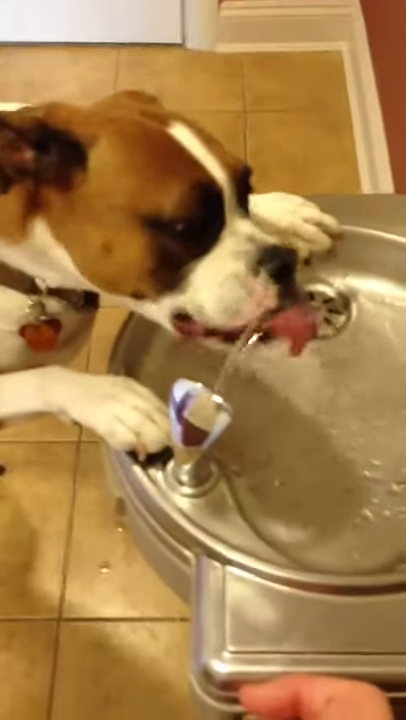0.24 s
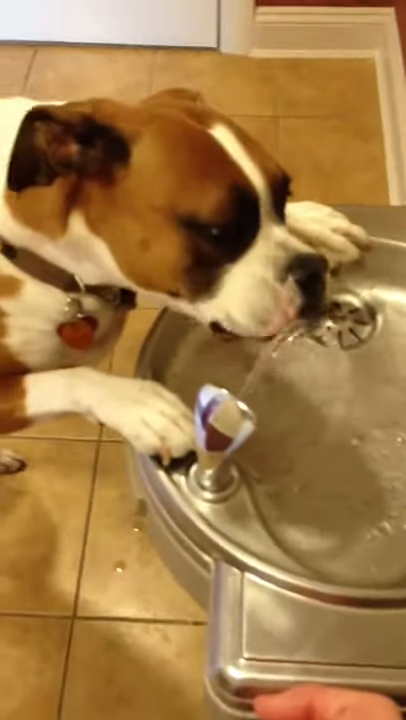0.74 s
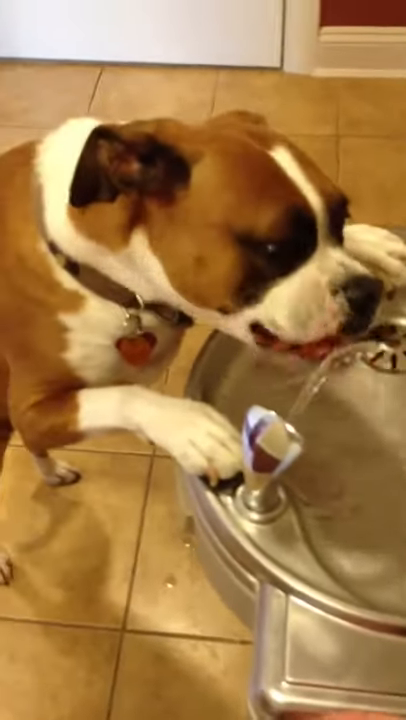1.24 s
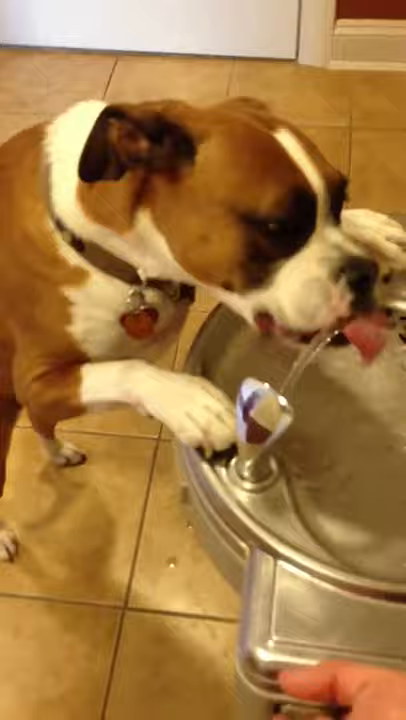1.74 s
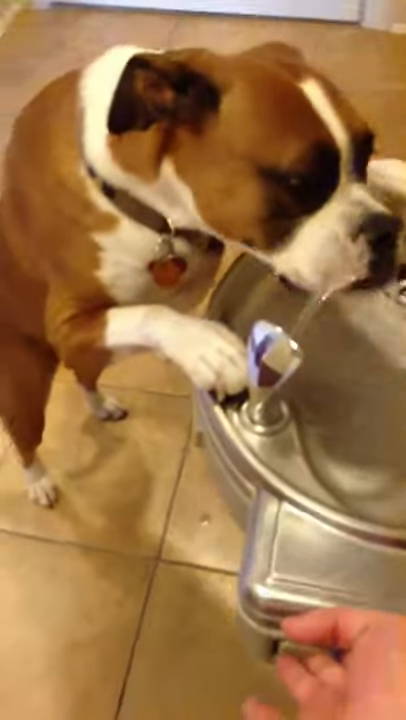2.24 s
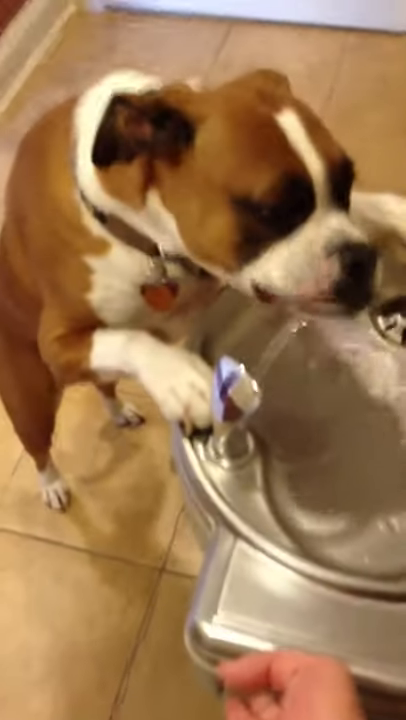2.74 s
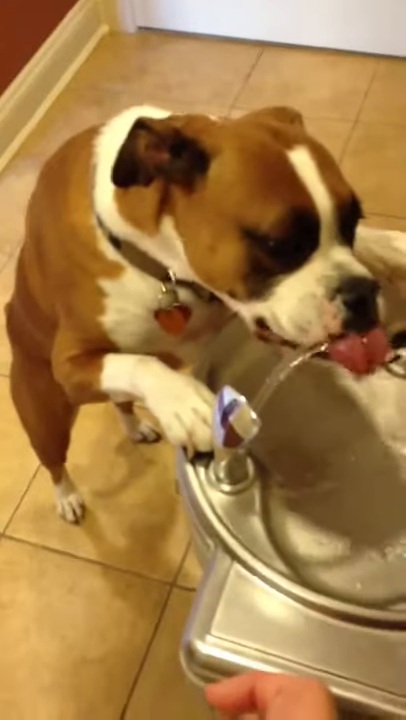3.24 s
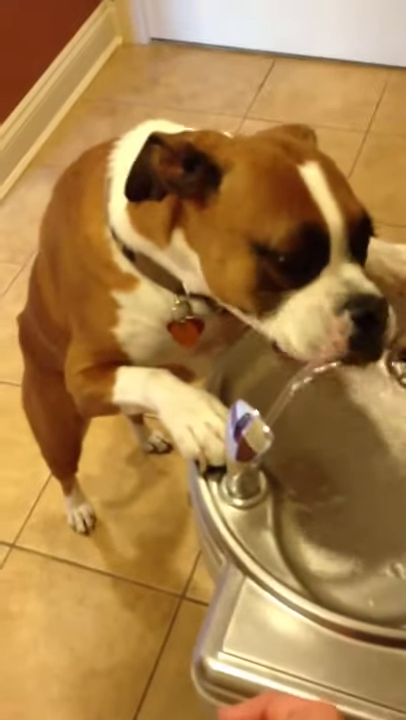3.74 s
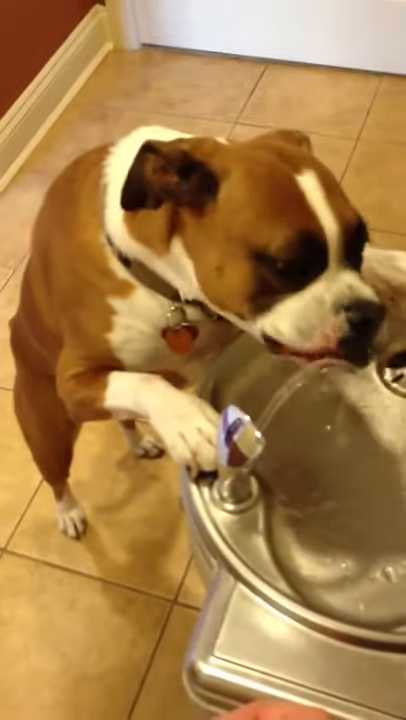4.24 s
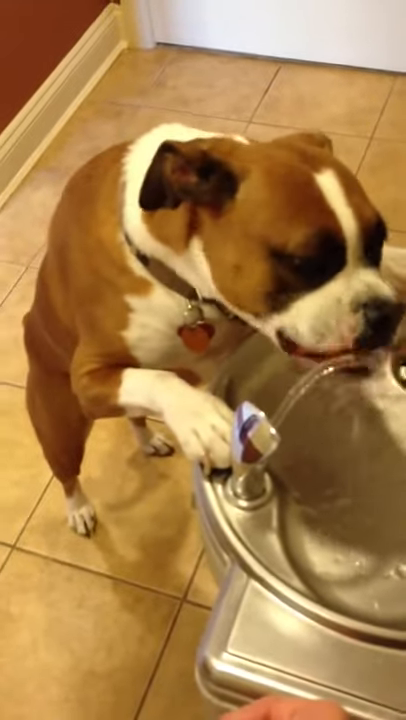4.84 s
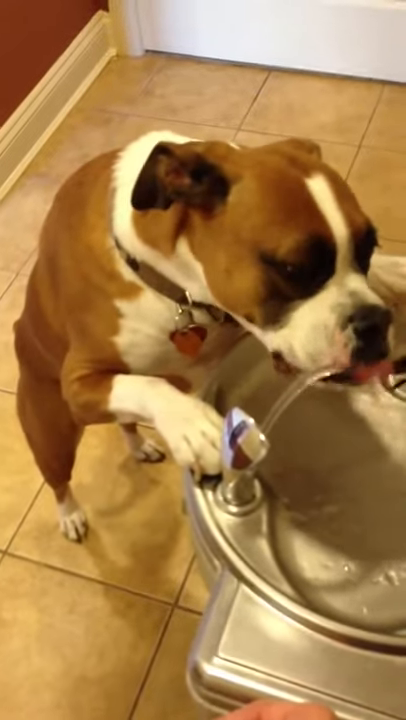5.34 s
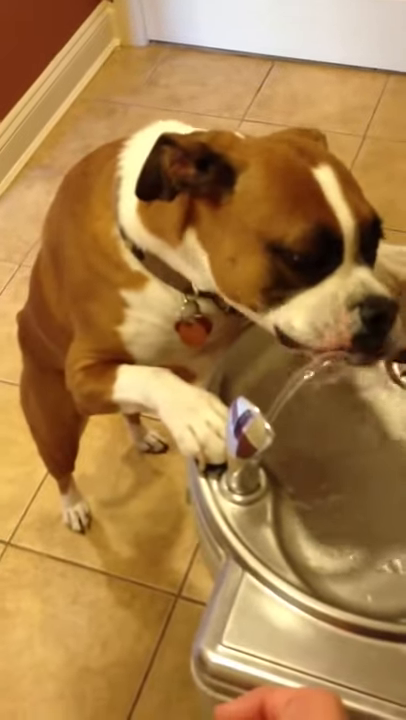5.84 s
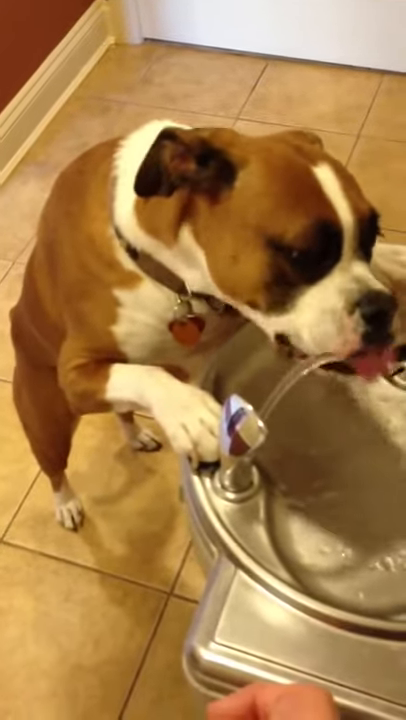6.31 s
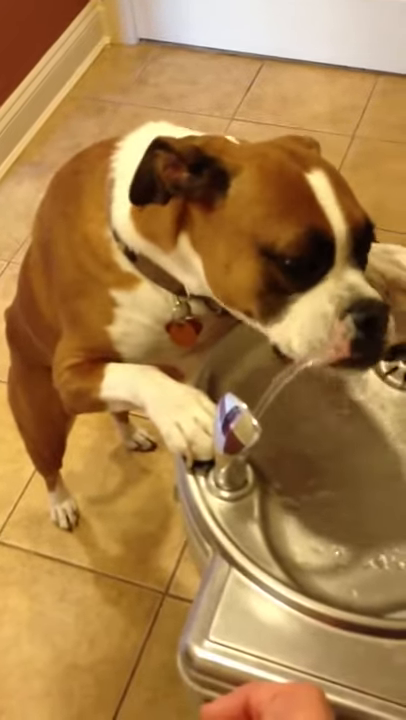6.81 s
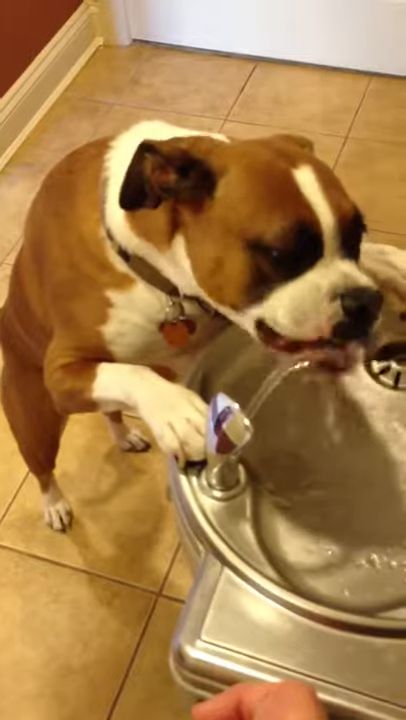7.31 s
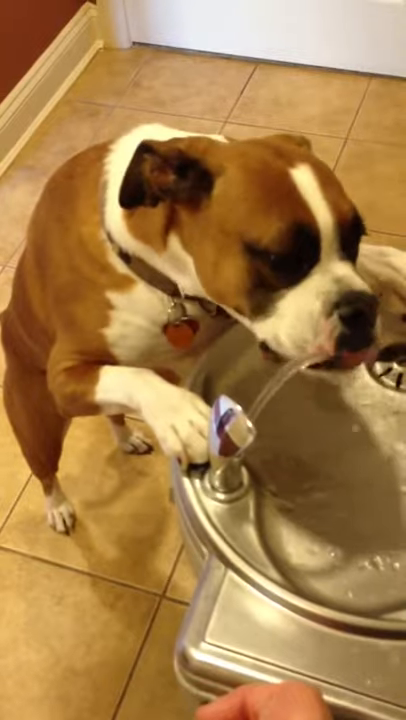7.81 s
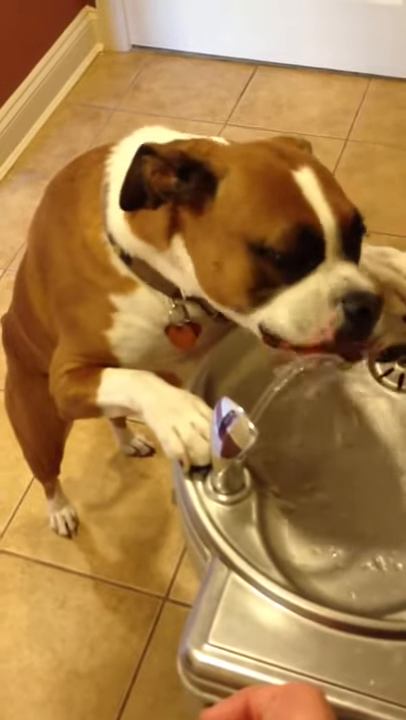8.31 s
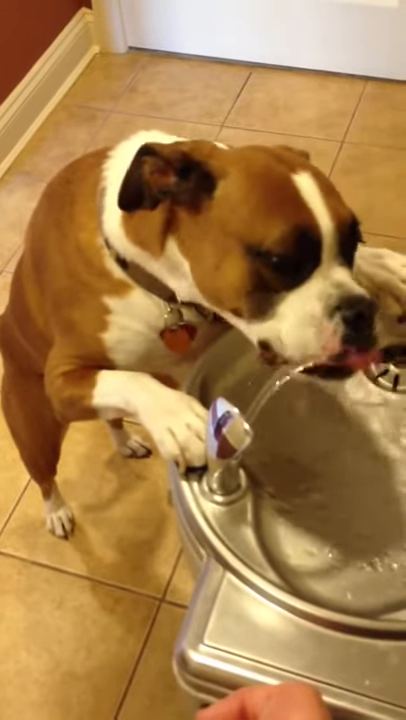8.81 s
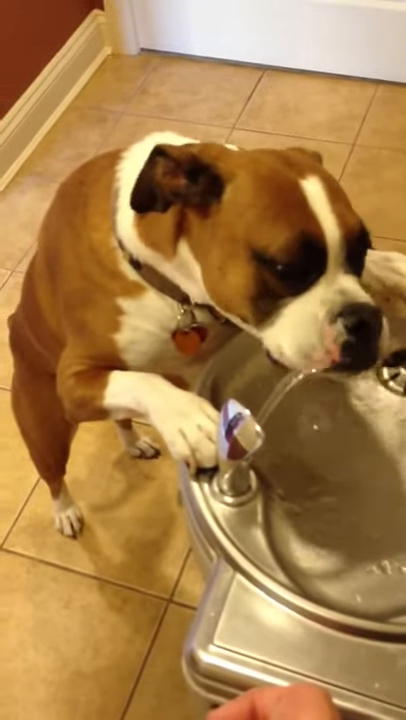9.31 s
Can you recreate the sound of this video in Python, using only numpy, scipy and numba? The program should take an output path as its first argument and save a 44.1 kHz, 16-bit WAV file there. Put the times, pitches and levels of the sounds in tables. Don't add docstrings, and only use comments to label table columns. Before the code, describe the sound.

Close, irregular wet lapping and smacking, with drips ticking on metal, soft gulping thuds, trickling water and a steady cooler hum in a hard room.

```python
import sys
import numpy as np
from scipy import signal
from scipy.fft import rfft, irfft
from scipy.io import wavfile
from scipy.ndimage import uniform_filter1d
from numba import njit

SR = 44100
rng = np.random.default_rng(int(sys.argv[2]) if len(sys.argv) > 2 else 0)


def elevation(decibels):
    levels = np.asarray(decibels, float)
    return 10 ** (levels / 20)


def transcribe(u):
    v = np.clip(np.atleast_2d(u).T, -1, 1)
    q = np.round(v * 32767).astype(np.int16)
    wavfile.write(sys.argv[1], SR, q)


N = 421596

# (frequency [Hz], width [Hz], level [dB])
SHARED_COLOUR = [(345, 70, 3), (1650, 500, 4), (3100, 900, 2), (4800, 1000, 2), (5750, 700, -6)]


def laps():
    # (time [s], peak level [dB], pitch [Hz])
    lap_pops = [(0.0, -29, 1570), (0.1286, -17.5, 1560), (0.4013, -25.5, 1560), (0.7152, -28, 1900),
                (0.836, -34, 2260), (1.315, -20, 1590), (1.5814, -33, 1460), (1.777, -33.5, 1530),
                (1.918, -22.5, 1840), (2.1836, -32, 1000), (2.303, -30, 2360), (2.5202, -23.5, 1910),
                (2.6362, -24.5, 1900), (2.9607, -31.5, 2050), (3.1245, -27.5, 1670), (3.406, -26, 1860),
                (3.7356, -28, 1940), (3.9055, -29, 1950), (4.004, -33, 1260), (4.0572, -35, 1179),
                (4.639, -33, 1850), (5.54, -29, 1240), (6.779, -33.5, 1240), (7.12, -35.5, 1660),
                (7.3103, -30.5, 2400), (7.7374, -36, 1300), (7.8845, -30.5, 2100), (7.9209, -32, 2060),
                (8.5358, -32, 1780), (8.6617, -34, 1570),
                (0.257, -43, 1750), (0.979, -35.5, 1450), (1.915, -30, 950), (2.784, -34, 1720),
                    (4.295, -35, 1330), (4.501, -37, 1330), (5.1293, -39.5, 1380), (5.3716, -34, 1160),
                    (5.541, -37, 1600), (6.983, -38.5, 1410), (7.395, -34.5, 1350), (7.452, -37.5, 1080),
                    (8.0207, -36, 1470), (8.859, -34, 1830), (9.005, -36, 1760), (9.1677, -37, 1640),
                    (9.5073, -36, 1430), (0.129, -22.5, 1950), (0.4, -31, 1065), (0.716, -28.5, 1490),
                    (3.405, -34, 1240), (2.375, -39, 2500), (3.264, -35, 1980)]
    bursts = rung(lap_pops, cycles=6.5, middle_hz=1700, growth=.3)
    return pops(bursts, lead_s=.001519, gain_db=2.7, rise=.0053, swell=.68,
                snap_db=-3.8, octaves=.86, snap_cycles=2.76, count=6)


def smacks():
    # (time [s], peak level [dB], pitch [Hz])
    small_bursts = [(0.0308, -30, 3660), (0.4005, -31.5, 3160), (0.7123, -35, 2970), (0.9777, -31, 3070),
                    (1.3124, -28.5, 4750), (1.5773, -37, 4540), (1.9126, -29.5, 4800), (2.185, -33.5, 3080),
                    (2.5212, -29.5, 2930), (2.6424, -27, 4100), (2.644, -24, 4940), (2.9597, -32, 5160),
                    (3.1218, -29.5, 2660), (3.2959, -32, 2700), (3.3972, -32, 3230), (3.736, -40, 2600),
                    (3.9055, -33.5, 2700), (4.815, -33.5, 4700), (5.44, -37, 3100), (5.5395, -33.5, 3160),
                    (5.7254, -34, 4290), (6.3445, -31, 4300), (6.5026, -28, 3220), (6.7845, -37, 3090),
                    (7.1132, -35, 2900), (8.0227, -31.5, 3380), (8.8583, -33, 2520), (9.2903, -32, 4460),
                    (9.2903, -29, 3410), (9.4838, -34.5, 2560),
                    (0.1281, -44, 2490), (0.5718, -36, 4000), (0.838, -37, 4700), (0.866, -34.5, 2450),
                     (1.9126, -33.5, 2956), (2.0388, -37.5, 3200), (2.299, -38, 2700), (2.4556, -33, 4330),
                     (2.785, -41, 2850), (3.0187, -37, 4470), (3.2416, -33, 3950), (4.2951, -38.5, 3330),
                     (4.558, -42, 3500), (4.915, -37.5, 3070), (5.1246, -39.5, 3000), (5.248, -39, 2630),
                     (5.7502, -36.5, 2540), (6.1729, -35.5, 3140), (6.5026, -38, 3880), (6.6782, -33, 5200),
                     (6.982, -36.5, 2720), (7.2769, -35.5, 4560), (7.295, -34.5, 2820), (7.7474, -36, 3870),
                     (7.8795, -34, 4740), (8.2672, -35, 4470), (8.3796, -31.5, 3960), (8.508, -31, 4430),
                     (8.6617, -35, 3460), (9.0055, -33, 3200),
                    (0.401, -32.5, 4480), (1.7778, -39.5, 2900), (2.636, -33, 2700), (2.6362, -33, 4130),
                     (3.125, -31, 5300), (3.399, -32, 4950), (3.899, -31, 5100), (4.1939, -40, 2720),
                     (4.238, -36, 4450), (5.1991, -33.5, 5500), (6.0662, -40.5, 3000),
                     (6.2996, -37.5, 2650), (3.737, -33.5, 4400), (8.221, -44, 2400), (8.515, -34.5, 3900),
                     (9.1474, -43.5, 2400), (9.19, -41, 2330), (2.302, -33, 4200), (4.006, -39, 3400),
                     (4.637, -30, 6460), (5.785, -38, 3200), (5.885, -41, 3400), (5.5, -43, 5500),
                     (6.345, -26.5, 5400), (6.3984, -36, 4300), (6.692, -40, 2660), (9.0055, -35, 4200),
                     (1.025, -38, 3250), (0.716, -30, 2560), (0.719, -34, 2900), (0.7175, -40, 2800),
                     (0.726, -45, 3950), (0.031, -40, 2240), (0.13, -34.5, 5000), (3.053, -42, 5200),
                     (1.318, -35, 2130), (1.70, -41.5, 2200), (2.6445, -31.5, 3420), (2.6445, -39, 5500),
                     (2.376, -37, 4600), (6.79, -36, 3050), (6.803, -41, 3100), (6.513, -36, 2950),
                     (3.405, -31, 3300), (2.68, -40, 5200), (3, -42, 4000), (0.985, -34, 3020),
                     (4.09, -41, 4700), (2.655, -37, 4900), (2.664, -34, 3700), (6.59, -45, 4200),
                     (6.72, -46, 4300), (7.92, -35.5, 5000), (7.965, -46, 4200), (9.147, -37.5, 5100),
                     (9.19, -38, 4800), (5.4, -42, 4500), (4.857, -43, 4200), (4.926, -39, 3240)]
    bursts = rung(small_bursts, cycles=10.5, middle_hz=3400, growth=.15)
    return pops(bursts, lead_s=.0004, gain_db=10.2, rise=.019, swell=.88,
                snap_db=-10.0, octaves=.51, snap_cycles=14.2, count=6)


def drops():
    # (time [s], peak level [dB], pitch [Hz])
    drop_hits = [(0.127, -42, 12400), (0.7133, -37.5, 6230), (0.839, -44, 8230), (0.978, -42, 5600),
                 (1.1014, -43, 6850), (1.5784, -39, 6800), (1.8195, -38.5, 10700), (1.913, -42, 6600),
                 (2.0827, -43, 6860), (2.1277, -38, 8000), (2.7107, -39.5, 7500), (2.7847, -36, 11900),
                 (2.9586, -38, 8440), (3.398, -39.5, 5950), (3.6356, -34, 12100), (4.1967, -38.5, 8850),
                 (4.4365, -40, 7260), (4.4834, -39, 11000), (5.1093, -41, 10100), (5.44, -41, 6940),
                 (5.4938, -32, 9260), (5.883, -43, 10400), (6.9915, -41, 6150), (7.014, -37.5, 11300),
                 (7.3302, -36, 10900), (8.0227, -36.5, 6670), (8.2661, -41, 12200), (8.5989, -39, 6200),
                 (9.3501, -40, 6500), (9.4823, -42, 7400), (0.3366, -45, 7600), (0.5691, -44, 7140),
                 (3.1148, -46, 6170), (3.7339, -40, 12000), (4.575, -49, 5600), (4.8888, -41, 11600),
                 (6.1649, -45, 9970), (6.3984, -42, 7040), (7.2499, -45, 7170), (7.6784, -42, 6900),
                 (7.9174, -44, 6670), (8.309, -48, 6440), (8.6557, -41.5, 6880), (9.2823, -48, 6810),
                 (1.258, -46, 8800)]
    bursts = rung(drop_hits, cycles=21, middle_hz=6100, growth=.045)
    return pops(bursts, lead_s=.0007, gain_db=11.2, rise=.003, swell=.084,
                snap_db=-3.0, octaves=.61, snap_cycles=8.1, count=6)


def gulps():
    # (time [s], peak level [dB], pitch [Hz])
    swallows = [(0.374, -38, 350), (1.011, -34.5, 363), (1.573, -38, 347), (1.674, -39, 343),
                (2.831, -33.5, 344), (3.453, -39.5, 378), (4.053, -29, 372), (4.35, -33.5, 277),
                (4.61, -35, 338), (4.965, -30.5, 350), (5.235, -31.5, 596), (5.594, -38.5, 366),
                (5.869, -42, 370), (6.222, -35.5, 336), (6.832, -36, 332), (7.09, -31, 593),
                (7.449, -35, 400), (8.078, -32.5, 394), (8.345, -40, 339), (8.715, -33, 353),
                (8.973, -31, 299), (8.974, -34.5, 580), (8.35, -36.5, 610), (4.06, -45, 655),
                (2.25, -48, 534), (9.26, -37.5, 370), (9.343, -31.5, 310), (0.455, -37.5, 340),
                (0.835, -42, 348), (2.262, -40, 296), (4.998, -38, 324), (7.71, -43.5, 555),
                (8.13, -39, 330)]
    bursts = rung(swallows, cycles=5.3, middle_hz=356, growth=.83)
    return pops(bursts, lead_s=.00279, gain_db=3.1, rise=.0029, swell=.56,
                snap_db=-8.0, octaves=.77, snap_cycles=3.0, count=4)


def gurgles():
    # (centre [s], half length [s], level [dB], top of the band [Hz])
    throat_swells = [(0.448, 0.12, -52.5, 465), (1.618, 0.039, -49.5, 510), (2.24, 0.031, -46.5, 1430),
                     (2.497, 0.033, -49, 900), (4.022, 0.013, -54, 1300), (4.628, .015, -51, 890),
                     (5.24, 0.009, -71, 900), (6.98, 0.071, -54.5, 884), (7.425, 0.027, -68, 900),
                     (8.373, 0.027, -58, 690), (8.972, 0.012, -47, 1100)]
    t = np.arange(N) / SR
    rattle = rng.standard_normal(N) * elevation(3.6 * walk(120))
    out = np.zeros(N)
    for centre_s, half_s, db, top_hz in throat_swells:
        band = colour(rattle, [(100, -30), (180, 0), (top_hz, -6), (2 * top_hz, -30)])
        out += elevation(db) * np.exp(-((t - centre_s) / half_s) ** 2) * band
    return out


def dog():
    # (delay [s], level [dB])
    near_echoes = [
        (.0021, -15),
        (.0056, -7),
        (.0155, -11),
    ]
    lap, smack, drop, gulp = laps(), smacks(), drops(), gulps()
    throat = gurgles()
    close = np.sum(lap + smack + drop + gulp, axis=0) + throat
    near = sum(elevation(db) * np.roll(close, int(s * SR)) for s, db in near_echoes)
    ring, snap = elevation(-.3) * lap + elevation(-4) * smack + elevation(-1) * drop + elevation(-4) * gulp
    sent = ring + elevation(-1.5) * snap + throat
    head_turn_s = .11
    pose = np.arange(N) // int(head_turn_s * SR) % 3
    walls = sum(room(sent * uniform_filter1d(1. * (pose == k), size=400)) for k in range(3))
    patchy = elevation(1.1 * walk(70) + 1.3 * walk(300))
    return resonate(close + near + patchy * walls, SHARED_COLOUR)


def rung(table, cycles, middle_hz, growth):
    s, db, hz = np.transpose(table)
    return np.transpose([s, db, hz, cycles * (hz / middle_hz) ** growth])


def pops(table, lead_s, gain_db, rise, swell, snap_db, octaves, snap_cycles, count):
    splash_s = .0055
    s, db, hz, cycles = np.transpose(table)
    chance = rng.uniform(-1, 1, (len(s), count, 3))
    start = np.maximum(s - lead_s, 0) * SR
    ring = bubbles(start.astype(np.int64), hz, np.clip(cycles, 1, 60) / 3, elevation(db + gain_db),
                   np.full(len(s), rise), swell)
    start = (start[:, None] + splash_s * SR * np.abs(chance[..., 0]) ** 2).ravel()
    size = elevation(db[:, None] + gain_db + snap_db + 2 * chance[..., 1]).ravel()
    places = (2 * np.arange(count) + 1 + chance[..., 2]) / count - .7
    hz = (hz[:, None] * 2 ** (octaves * places)).ravel()
    snap = bubbles(start.astype(np.int64), hz, np.full(hz.size, snap_cycles / 3), size, 0 * hz, swell)
    return np.array([ring, snap])


@njit
def bubbles(start, hz, cycles, size, rise, swell):
    out = np.zeros(N)
    for e in range(len(start)):
        span, phase = cycles[e] * SR / hz[e], 0.
        for j in range(min(int(5 * span), N - start[e])):
            phase += 2 * np.pi * min(hz[e] * (1 + rise[e] * j / span), .45 * SR) / SR
            envelope = (1 - np.exp(-j / (swell * span))) * np.exp(-j / span)
            out[start[e] + j] += size[e] * np.sin(phase) * envelope
    return out


def drips():
    # (start [s], length [s], level [dB], pitch [Hz])
    runoff = [(0.035, 0.085, -49.5, 1400), (0.058, 0.058, -48.5, 3680), (0.383, 0.042, -47, 1020),
              (0.424, 0.061, -50, 2750), (0.708, 0.038, -54, 680), (0.851, 0.071, -56.6, 805),
              (0.973, 0.073, -47.5, 3730), (1.007, 0.16, -54.5, 840), (1.617, 0.119, -54.4, 990),
              (1.884, 0.05, -50, 1100), (1.977, 0.044, -49.1, 2520), (2.073, 0.03, -51.0, 3320),
              (2.18, 0.029, -48.8, 6920), (2.183, 0.065, -48.7, 1380), (2.253, 0.064, -51.6, 650),
              (2.45, 0.038, -52.4, 750), (2.511, 0.032, -50, 7000), (2.81, 0.032, -50, 3080),
              (2.816, 0.058, -54, 840), (3.001, 0.049, -52.7, 1780), (3.094, 0.044, -55, 680),
              (3.167, 0.032, -55, 600), (3.292, 0.061, -49.5, 4950), (3.373, 0.031, -52, 470),
              (3.715, 0.035, -52.2, 1000), (3.773, 0.046, -51.5, 4260), (4.055, 0.038, -51, 590),
              (4.232, 0.029, -50.2, 4500), (4.264, 0.044, -56, 580), (4.348, 0.087, -55.1, 920),
              (4.908, 0.052, -53.5, 1320), (4.911, 0.037, -50, 6480), (5.265, 0.038, -50, 5530),
              (5.283, 0.035, -50.6, 2870), (5.518, 0.05, -47, 9460), (6.493, 0.035, -54, 1390),
              (6.734, 0.072, -55, 570), (6.766, 0.029, -47, 3030), (6.83, 0.073, -56, 930),
              (7.288, 0.052, -56, 1040), (7.355, 0.058, -54.5, 520), (7.373, 0.046, -51.1, 3490),
              (7.741, 0.04, -52, 2360), (8.223, 0.038, -52.8, 3930), (8.47, 0.057, -53.1, 490),
              (8.92, 0.044, -54, 600), (8.969, 0.064, -53, 654), (9.184, 0.041, -54, 1380)]
    # (start [s], length [s], level [dB], pitch [Hz])
    mouth_drains = [(0.41, 0.075, -55, 3200), (0.73, .1, -52, 2800), (0.995, 0.093, -52, 3000),
                    (2.3, 0.037, -48, 4300), (2.3, .035, -50, 2700), (2.655, .09, -46.5, 4400),
                    (2.79, .04, -51, 2950), (2.97, .07, -50.5, 2010), (3.415, 0.15, -52.5, 3300),
                    (3.43, .15, -53, 1900), (3.91, 0.087, -50, 1900), (4.3, .06, -53, 3300),
                    (4.825, 0.056, -55, 4600), (6.52, .1, -54, 3150), (6.79, .11, -51, 3130),
                    (7.12, 0.094, -52.5, 2900), (8.03, 0.087, -51.5, 3410), (8.515, .06, -51, 4300),
                    (8.87, .09, -54, 2450), (9.02, 0.085, -54, 3000), (9.15, .11, -53.5, 2340),
                    (9.3, 0.088, -49.5, 3390), (9.3, .05, -51, 4870), (0.4, .11, -50.5, 419),
                    (1.02, .07, -52, 380), (1.6, .1, -51.5, 450), (2.22, .07, -53, 900),
                    (4.06, 0.096, -50.5, 432), (6.84, .12, -54, 391), (9.36, .07, -51, 379),
                    (0.14, .1, -45, 2000), (0.725, .1, -49, 1900), (0.725, .1, -50, 1500),
                    (2.655, .07, -49, 5300), (9.01, .04, -51, 4300), (8.9, .06, -54, 4700),
                    (2.2, .07, -52, 1400), (5.55, .07, -51, 1150), (5.26, .08, -54, 2800),
                    (7.88, .07, -53, 3100), (1.93, .06, -50, 2100)]
    return (trickles(runoff, cycles=3, octaves=.28, rise=.02)
            + trickles(mouth_drains, cycles=5.0, octaves=.13, rise=.004))


def trickles(table, cycles, octaves, rise, count=14):
    s, length, db, hz = np.array(table).T[..., None]
    when, pitch, size = np.moveaxis(rng.random((len(table), count, 3)), -1, 0)
    late = ((np.arange(count) + when) / count) ** 1.3
    start = ((s + length * late) * SR).astype(np.int64).ravel()
    hz = hz * 2 ** (octaves * (2 * pitch - 1))
    size = elevation(db + 6.6 * size - 6.2 * late + 7.5) * np.sqrt(length * hz / (count * cycles))
    return bubbles(start, hz.ravel(), np.full(hz.size, cycles), size.ravel(), np.full(hz.size, rise), .43)


def jet():
    # (frequency [Hz], level [dB per Hz])
    jet_colour = [(2940, -72), (5000, -29), (5630, -6), (6740, 2), (8740, 5.5), (9560, 3), (13100, 1.5),
                  (14400, -2.5), (15500, -8.5)]
    # (frequency [Hz], width [Hz], level [dB])
    nozzle = [(7914, 35, 3), (8415, 40, 5), (8852, 30, 7), (9076, 30, 7), (9983, 20, 7), (10494, 40, 5),
              (12900, 40, 3)]
    spray = elevation(-11) * fizz(6000, 14000, cycles=4.0, scatter_db=3.0, count=4000)
    return resonate(flicker(jet_colour, shared_db=.57, own_db=.96, rate=24), nozzle) + spray


def slosh():
    # (frequency [Hz], level [dB per Hz])
    slosh_colour = [(470, -28), (800, 6.5), (929, 5.5), (1780, 4), (1940, 4), (3710, -0.5), (4870, 3),
                    (5500, -1), (6500, -11), (8450, -36), (14300, -120)]
    small = fizz(1500, 7000, cycles=3.0, scatter_db=2.8, count=1200)
    waves = flicker(slosh_colour, shared_db=1.5, own_db=1.2, rate=14)
    return waves + resonate(elevation(-11.0) * small + elevation(-17.5) * room(small), SHARED_COLOUR)


def rumble():
    # (frequency [Hz], level [dB per Hz])
    rumble_colour = [(60, -26), (95, -16), (120, -9.5), (160, -2), (260, 2), (345, -1), (450, -3),
                     (700, -4.5), (1000, -29)]
    return resonate(flicker(rumble_colour, shared_db=.4, own_db=2.2, rate=12), SHARED_COLOUR)


def water():
    # (time [s], level [dB])
    stir = [
        (0.0, 4.5),
        (0.3, 1.5),
        (0.56, 0),
        (0.85, 4.5),
        (1.65, 1.5),
        (2.66, 4),
        (3.0, 1.5),
        (3.94, 3.2),
        (4.3, 1.7),
        (9.56, 2.2),
    ]
    stir_db = np.interp(np.arange(N) / SR, *np.transpose(stir))
    jet_db, slosh_db, rumble_db = -48.5, -53.5, -53
    jet_follows = .14
    hiss = elevation(jet_db + jet_follows * stir_db) * jet()
    wash = elevation(slosh_db + stir_db) * slosh()
    return hiss + wash + elevation(rumble_db) * rumble()


def fizz(low_hz, high_hz, cycles, scatter_db, count):
    when, pitch, luck = rng.random((count, 3)).T
    hz = low_hz * (high_hz / low_hz) ** pitch
    size = elevation(-scatter_db * np.log(luck + .02))
    x = bubbles((when * N).astype(np.int64), hz, np.full(count, cycles), size, np.full(count, .03), .35)
    return x / np.std(x)


def cooler():
    # (frequency [Hz], level [dB])
    fan_lines = [(120.0, -64), (181.3, -63), (240.0, -69.5), (262.3, -71), (347.8, -64)]
    compressor_hz, compressor_db = 207.25, -49.5
    t = np.arange(N) / SR
    level = elevation(compressor_db + .22 * walk(1.5))
    hum = level * np.sin(2 * np.pi * compressor_hz * t + .58 * walk(3.18))
    for hz, db in fan_lines:
        level = elevation(db + 2.4 * walk(11.0))
        hum = hum + level * np.sin(2 * np.pi * hz * t + .38 * walk(3.12))
    return np.sqrt(2) * hum


def room(x, gap_s=.004, early_s=.035, early_db=4.0):
    # (frequency [Hz], decay [s])
    decay_times = [(300, .8), (1500, 1.05), (3000, .8), (6000, .6), (12000, .4)]
    t = np.arange(SR) / SR
    spectrum, hz = rfft(rng.standard_normal(SR)), np.fft.rfftfreq(SR, 1 / SR) + 1
    tail = 0
    for f in 125 * 2. ** np.arange(0, 7.5, .5):
        band = irfft(spectrum * np.clip(1 - 2 * np.abs(np.log2(hz / f)), 0, 1), SR)
        lumps = np.sqrt(uniform_filter1d(band ** 2, int(12 * SR / f)) + 1e-12)
        even = band * np.std(band) / lumps
        tail = tail + even * elevation(-60 * t / along(decay_times, f))
    tail = tail * (1 - np.exp(-t / gap_s)) * elevation(early_db * np.exp(-t / early_s))
    return signal.fftconvolve(x, tail / np.sqrt(np.sum(tail ** 2)))[:N]


def resonate(x, peaks):
    hz, width, db = np.transpose(peaks)
    turn, damp, gain = -2 * np.cos(2 * np.pi * hz / SR), np.pi * width / SR, elevation(db / 2)
    sections = np.array([1 + damp * gain, turn, 1 - damp * gain, 1 + damp / gain, turn, 1 - damp / gain])
    return signal.sosfilt((sections / sections[3]).T.copy(), x)


def flicker(table, shared_db, own_db, rate):
    spectrum, hz = rfft(colour(rng.standard_normal(N), table)), np.fft.rfftfreq(N, 1 / SR) + 1
    shared, out = walk(rate), 0
    for centre in np.arange(np.log2(table[0][0]), np.log2(table[-1][0]) + .5, .5):
        share = np.clip(1 - 2 * np.abs(np.log2(hz) - centre), 0, 1)
        out = out + elevation(shared_db * shared + own_db * walk(rate)) * irfft(spectrum * share, N)
    return out / np.std(out)


def walk(rate):
    k = int(SR / rate)
    steps = np.repeat(rng.standard_normal(N // k + 1), k)
    return 1.3 * uniform_filter1d(uniform_filter1d(steps, k), k)[:N]


def colour(x, table):
    y = irfft(rfft(x) * elevation(along(table, np.fft.rfftfreq(len(x), 1 / SR))), len(x))
    return y / np.sqrt(np.mean(y ** 2))


def along(table, hz):
    points_hz, values = np.array(table).T
    return np.interp(np.log(hz + 1e-9), np.log(points_hz), values)


def scene():
    steady = dog() + water() + cooler()
    drip = drips()
    return np.tile(steady + drip + elevation(-6.5) * room(drip), (2, 1))


def thin_treble(x):
    # (frequency [Hz], level to the local mean [dB])
    gate = [(9000, -30), (11500, -9), (13000, -4.5), (14500, -2), (15500, -1)]
    hz, _, lines = signal.stft(x[0], SR, nperseg=2048)
    power = uniform_filter1d(uniform_filter1d(np.abs(lines) ** 2, size=4, axis=0), size=2, axis=1)
    local_mean = uniform_filter1d(uniform_filter1d(power, size=40, axis=0), size=5, axis=1)
    threshold = elevation(2. * along([(20, -90)] + gate, hz))[:, None]
    kept = power > local_mean * threshold
    return np.tile(signal.istft(lines * kept, SR, nperseg=2048)[1][:N], (2, 1))


def roll_off(x):
    return signal.sosfilt(signal.butter(12, 15720, fs=SR, output="sos"), x)


def record(dry):
    cut = signal.sosfilt(signal.butter(2, 110, "highpass", fs=SR, output="sos"), dry)
    cut = cut + elevation(-94.0) * colour(rng.standard_normal(N), [(20, 3), (60, 6), (200, -29)])
    top_hz = 15300
    cut = signal.sosfilt(signal.ellip(10, .2, 60, top_hz, fs=SR, output="sos"), cut)
    mix = thin_treble(cut)
    return roll_off(mix)


dry = scene()
out = record(dry)
transcribe(out)
```